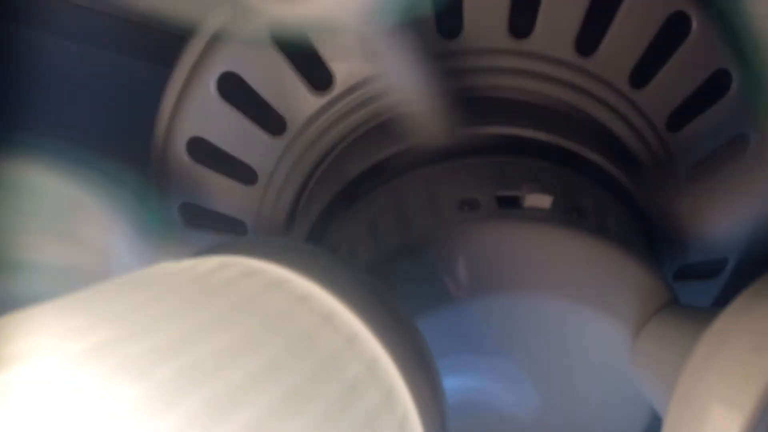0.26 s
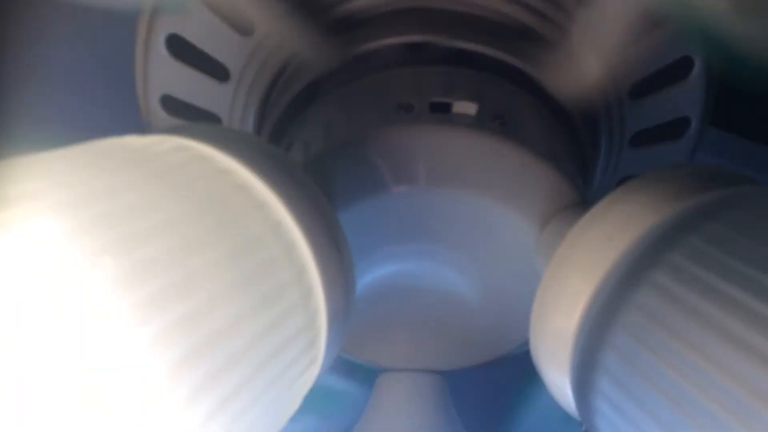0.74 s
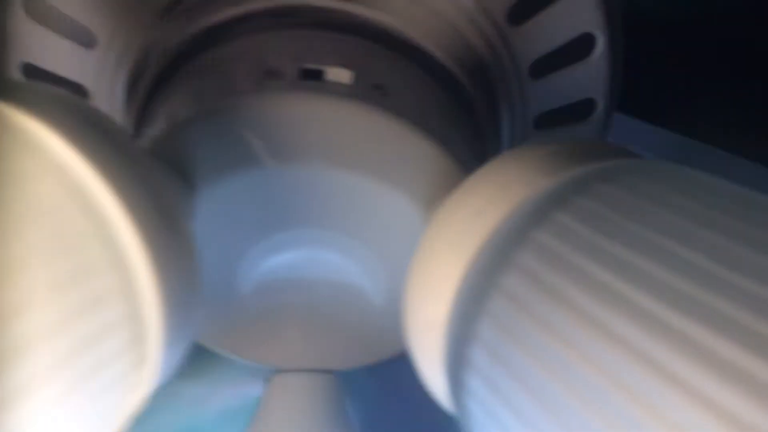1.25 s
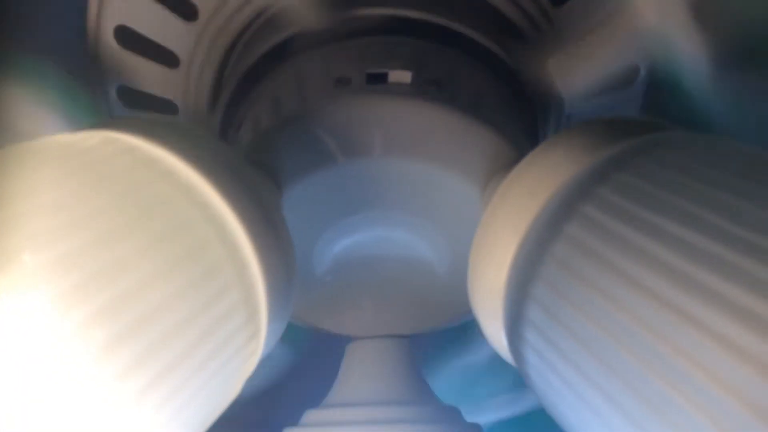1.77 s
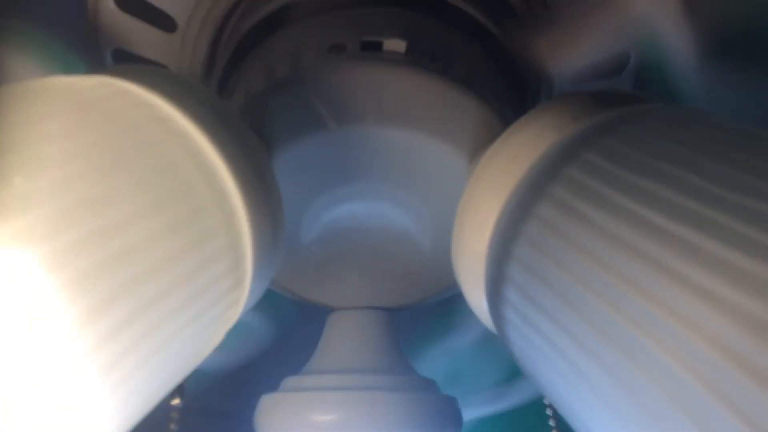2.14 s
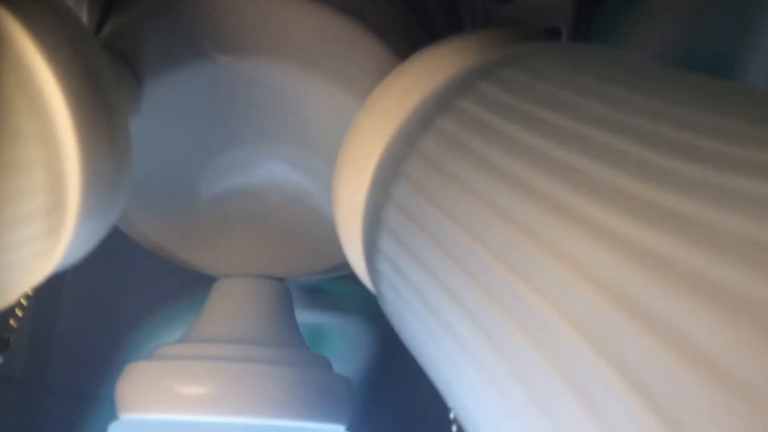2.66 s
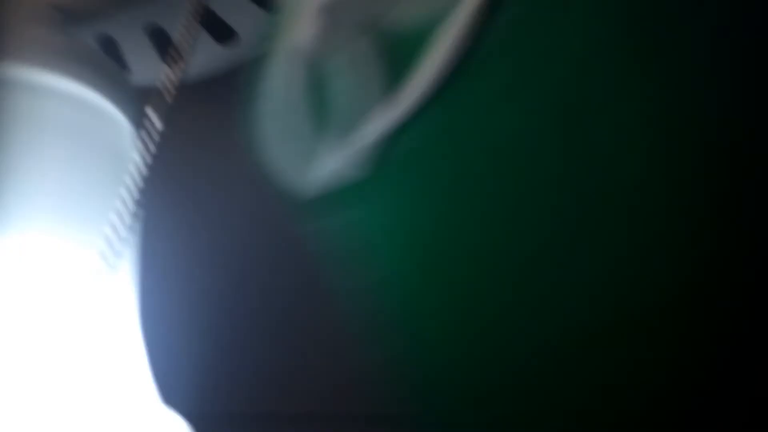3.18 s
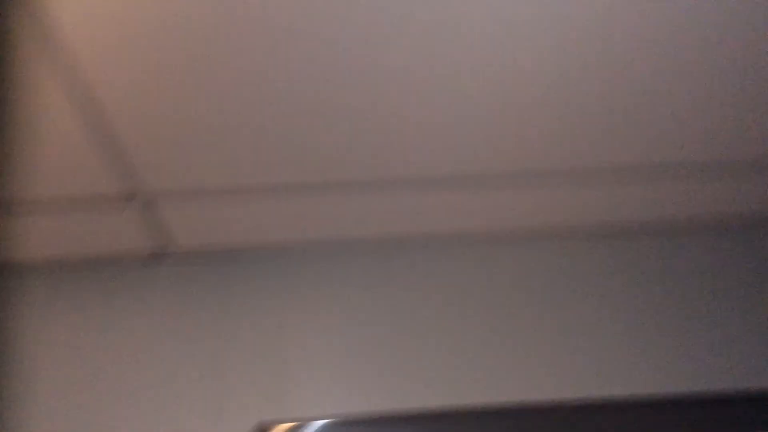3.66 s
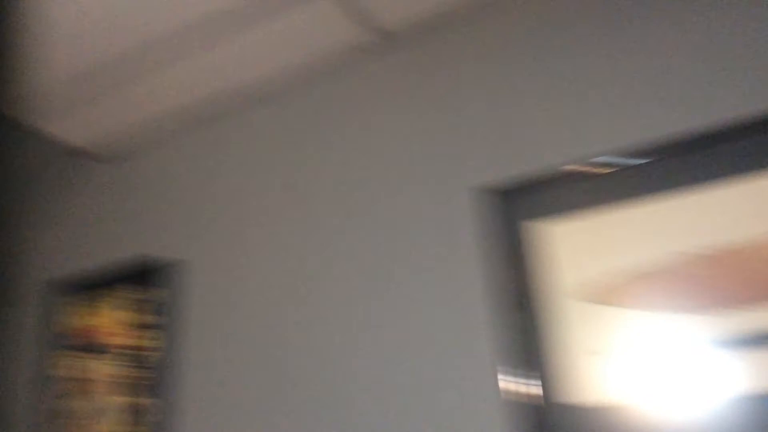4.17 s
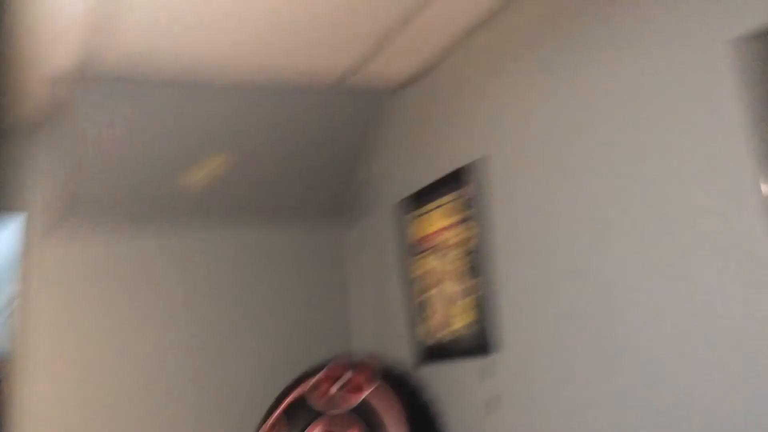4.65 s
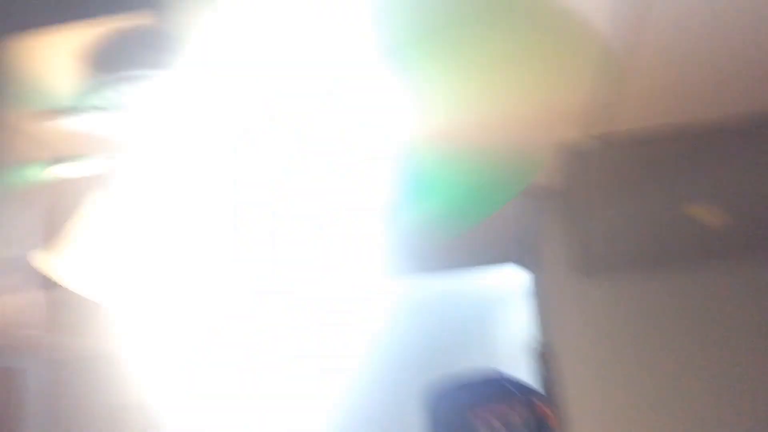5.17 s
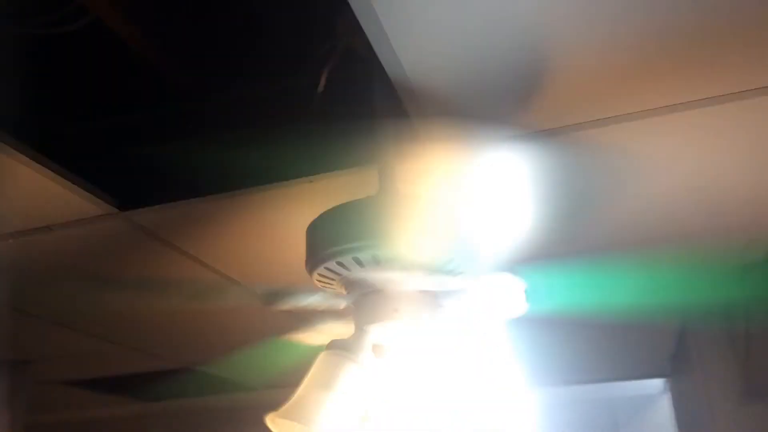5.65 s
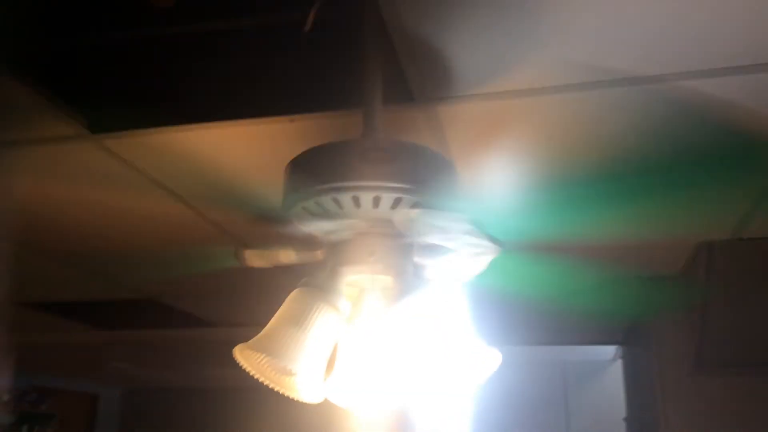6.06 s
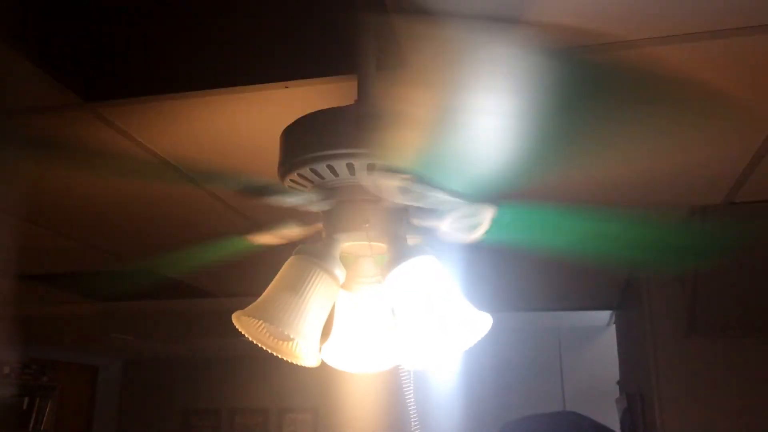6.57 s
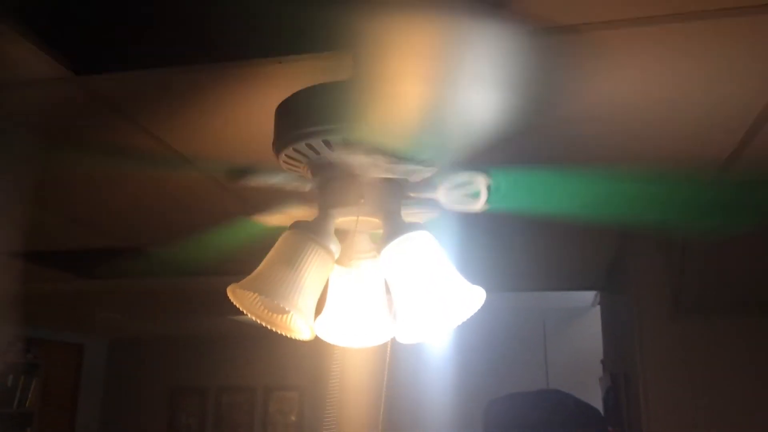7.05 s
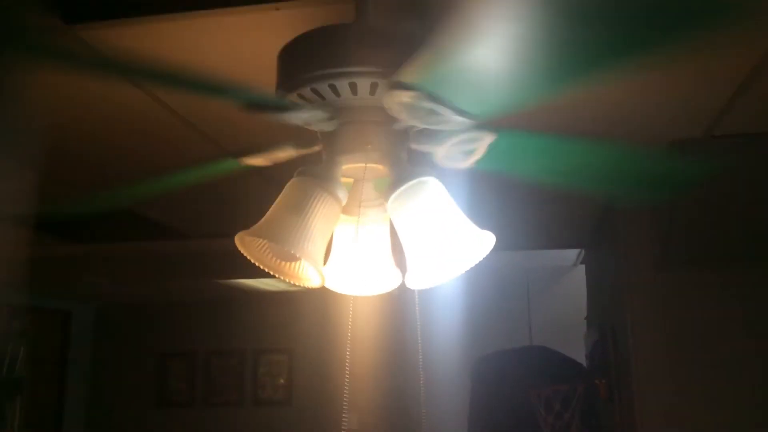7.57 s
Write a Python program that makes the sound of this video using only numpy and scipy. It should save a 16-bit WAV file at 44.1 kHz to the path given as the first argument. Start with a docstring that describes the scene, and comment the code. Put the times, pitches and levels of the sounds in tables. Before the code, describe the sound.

A low, wavering ceiling fan hum and soft stirred air continue quietly throughout, shifting slightly as the hand-held microphone moves in a small room. A parakeet whistle opens at 0 seconds with faint finger rubs; around 0.7 a short wing flutter comes with small bumps and ticks, then chirps from 0.9 to 1.5. From 1.6 to 2.9 a beak raps hollow plastic in sharp, uneven clusters, with soft warbles between. A quick contact call sounds at 3.0, and bright little bell clinks cluster from 3.2 to 3.5. Warbles grow around 4.0 to 4.5, with a faint creak, and feathery wing hiss runs from 4.2 to 4.9. A hard, dull microphone bump lands at 5.1, with smaller knocks after. A sharp chirp at 5.7 and another call at 5.9 lead to thin warbles, a few light taps and faint tinkles, then lively chirps from 7.1 to 7.7.

```python
"""Small room with a ceiling fan humming: wavering motor hum plus coloured noise for the stirred air.
Caged parakeets warble, chirp and call: gliding sine whistles with overtones. One flutters (shaped hiss),
raps a plastic toy with its beak (noise bursts through broad modes) and rings a little bell (decaying sines).
The hand-held microphone is bumped (low swing and tick), fingers slide on it (rub and crackle noise),
and its housing creaks (two harmonics)."""
import sys
import numpy as np
from scipy import signal
from scipy.fft import rfft, irfft
from scipy.io import wavfile
from scipy.ndimage import uniform_filter1d

SR = 44100
rng = np.random.default_rng(int(sys.argv[2]) if len(sys.argv) > 2 else 0)


def store_pcm(level_fs):
    """Save levels as 16-bit WAV."""
    pcm = np.round(np.clip(level_fs, -1, 1) * 32767).astype(np.int16)
    wavfile.write(sys.argv[1], SR, np.atleast_2d(pcm).T)


N = 344862


def gain_of(db):
    """Decibels to amplitude factor."""
    return 10 ** (np.asarray(db) / 20)


def evened(x):
    """Scales to rms 1."""
    return x / np.sqrt(np.mean(x ** 2) + 1e-20)


def read(points, hz):
    """Interpolates a table on a log-frequency axis."""
    f, value = np.transpose(points)
    return np.interp(np.log(hz + 1), np.log(f + 1), value)


def add(mix, start_s, sound):
    """Mixes a sound in at start_s."""
    part = mix[max(round(start_s * SR), 0):][:len(sound)]
    part += sound[:len(part)]


def played(rows):
    """Columns of a curve table at every sample."""
    s, *columns = np.transpose(rows)
    t = np.arange(s[0], s[-1], 1 / SR)
    return [np.interp(t, s, c) for c in columns]


def wander(count, smooth_s):
    """Random curve of rms 1: white noise smoothed twice."""
    size = max(round(smooth_s * SR), 1)
    once = uniform_filter1d(rng.standard_normal(count), size)
    return evened(uniform_filter1d(once, size))


def resonate(x, hz, width_hz):
    """Resonance of gain 1: shifts hz down to zero, smooths, shifts back."""
    turn = np.exp(2j * np.pi * np.cumsum(hz * np.ones(len(x))) / SR)
    r = np.exp(-np.pi * width_hz / SR)
    return 2 * (turn * signal.lfilter([1 - r], [1, -r], x / turn)).real


def noise(spectrum, count):
    """Noise of rms 1 with the given colour."""
    z = rfft(rng.standard_normal(count))
    colour = gain_of(read(spectrum, np.fft.rfftfreq(count, 1 / SR)))
    return evened(irfft(z * colour, count))


def swell(length_s):
    """Level curve in dB of a short action, 0 in its middle and lower at both ends."""
    end_db = -6
    t = np.arange(0, length_s, 1 / SR)
    return end_db * (2 * t / length_s - 1) ** 2


# whistle overtones: multiple of the pitch, level/dB
WHISTLE_OVERTONES = [(2, -6.5), (3, -15), (4, -24)]
# microphone colour on the whistle overtones: f/Hz, level/dB
MICROPHONE_COLOUR = [(4000, 7.5), (6400, -1.5), (7400, -6), (8600, 7), (9600, -4), (10800, -19.5),
                     (14000, -10.5)]


def note(length_s, db, first_hz, last_hz, over_db, rough, fade_db, warble):
    """A gliding whistle with overtones; roughness shakes its pitch, chops its level, adds an octave-down tone."""
    attack_s, onset_db, suboctave_db = 0.0053, -22, -14
    t = np.arange(0, length_s, 1 / SR)
    count = len(t)
    effort_db = db + onset_db * np.maximum(1 - t / attack_s, 0) + fade_db * t / length_s
    glide_hz = first_hz + (last_hz - first_hz) * t / length_s
    rough = np.clip(rough, 0, 1)
    # pitch deviation as a fraction
    shake = warble * wander(count, 0.01156) + 0.0094 * wander(count, 0.0046)
    shake += 0.32 * rough * wander(count, 0.00077)
    hz = glide_hz * (1 + shake)
    turns = np.cumsum(hz) / SR
    tone = np.sin(2 * np.pi * turns) + rough * gain_of(suboctave_db) * np.sin(np.pi * turns)
    upper = sum(gain_of(k_db + read(MICROPHONE_COLOUR, k * hz)) * np.sin(2 * np.pi * k * turns)
                for k, k_db in WHISTLE_OVERTONES)
    chop = gain_of(0.5 * wander(count, 0.0075) + 9 * rough * wander(count, 0.00054))
    voice = evened(chop) * (tone + gain_of(over_db) * upper)
    return gain_of(effort_db) * voice * signal.windows.tukey(count, .15)


# warbled notes, faint to fairly loud: t/s, length/s, level/dB, first f/Hz, last f/Hz, overtone level/dB
WARBLED_NOTES = [(0.0, 0.068, -32.5, 3410, 3320, -18), (0.097, .09, -51, 2070, 1890, -22),
                 (0.124, 0.089, -55, 3090, 2610, -8), (0.193, 0.076, -54, 1640, 1760, -17),
                 (1.082, 0.063, -50.5, 1900, 2020, -15), (1.227, 0.048, -49.5, 3350, 3190, 2.5),
                 (1.28, 0.065, -56, 2100, 2170, -15), (1.295, 0.11, -52, 2880, 2800, -6),
                 (1.507, .06, -55, 2100, 2170, -15), (1.974, 0.045, -44, 3170, 3010, -22),
                 (2.064, 0.056, -44, 3000, 2960, -12), (2.123, 0.13, -42, 2890, 2880, -5),
                 (2.129, 0.064, -39, 3690, 4130, -3), (2.334, 0.13, -46.5, 2864, 2890, -3),
                 (2.708, 0.16, -46, 3120, 3060, -24), (3.543, 0.097, -50, 2300, 2370, -21),
                 (3.622, 0.083, -47.5, 2750, 2640, -1), (3.66, 0.068, -55.5, 1750, 1590, -15),
                 (3.78, .07, -52, 3060, 2990, -8), (3.859, .12, -48, 2900, 2760, -8.5),
                 (3.949, 0.11, -51.5, 1860, 1867, 5.5), (3.989, 0.095, -44, 2650, 2670, -2),
                 (4.067, .1, -56, 1870, 1910, -2), (4.087, 0.11, -43.5, 3650, 3440, 1),
                 (4.18, 0.064, -32.5, 3440, 3480, 3), (4.464, 0.1, -31, 3780, 3830, -4),
                 (5.351, 0.063, -57.5, 2560, 2880, -1), (5.46, 0.057, -51, 3690, 3660, -8),
                 (5.498, .06, -55, 2030, 2050, -15), (5.568, 0.034, -40, 1870, 1844, -21.5),
                 (5.614, 0.071, -42.5, 2500, 2590, -27), (5.924, .05, -45.5, 2170, 2130, -22),
                 (6.112, 0.081, -41, 1860, 1890, -19), (6.252, 0.13, -55.5, 2300, 2320, -14),
                 (6.297, .07, -46, 3230, 3200, -12), (6.326, 0.15, -50, 1950, 1787, -15.5),
                 (6.423, .025, -47, 2020, 2900, -15), (6.45, 0.083, -57, 2580, 2446, -18.5),
                 (6.899, 0.056, -56.5, 2700, 2900, 1), (6.994, .025, -44.5, 3260, 2400, -20),
                 (7.018, 0.055, -58, 3010, 3150, -18), (7.072, 0.043, -48, 2500, 2640, -20),
                 (7.102, 0.081, -58, 2000, 2090, -18), (7.255, 0.085, -47.5, 3250, 3130, 3),
                 (7.305, 0.12, -49.5, 2300, 2580, -19), (7.388, 0.094, -52.5, 1750, 1706, -14),
                 (7.393, 0.065, -37.5, 3430, 3380, -10), (7.504, 0.027, -44, 3300, 3280, 4)]


def warbles(bird):
    """Warbled notes: nearly clear voice, wavering pitch, dying away."""
    for s, *row in WARBLED_NOTES:
        add(bird, s, note(*row, rough=0.08, fade_db=-15, warble=.06))


CHIRP_FADE_DB = -3.5  # holds, then stops
# chirped notes: t/s, length/s, level/dB, first f/Hz, last f/Hz, overtone level/dB, roughness 0-1
CHIRPED_NOTES = [(0.923, 0.031, -51, 2860, 3120, 1, 0.21), (0.951, 0.034, -37.5, 4410, 3740, -21, 0.21),
                 (0.991, 0.044, -35.5, 3222, 3482, -4.5, 0.14), (1.041, 0.078, -49, 3705, 3670, -10, 0.01),
                 (1.358, 0.018, -37.5, 3254, 3400, -6.5, 0.15), (1.369, 0.03, -39.5, 4270, 3530, -10, 0),
                 (1.411, 0.044, -43, 2890, 2993, -10, 0.21), (1.447, 0.15, -47, 3140, 3076, -9, 0.15),
                 (5.614, 0.047, -44, 5200, 3870, -6, 0.37), (5.67, .014, -23, 3920, 3040, -15, 0.18),
                 (5.699, .04, -34.5, 3130, 3450, -13, 0.21), (7.123, 0.029, -39, 4390, 4360, 2, 0.37),
                 (7.155, 0.0595, -36, 3284, 3275, 10.5, .1), (7.209, .025, -37, 4380, 4210, 3.5, 0.43),
                 (7.519, 0.016, -34, 3195, 3330, 7, 0.38), (7.539, 0.029, -28.5, 5000, 3560, 1.5, 0.25),
                 (7.561, 0.051, -30.5, 3136, 3100, 6.5, 0.05), (7.64, 0.043, -45, 2810, 2676, 17, 0.33)]


def chirps(bird):
    """Chirped notes: steadier pitch, level nearly held, per-note roughness."""
    for s, *row in CHIRPED_NOTES:
        add(bird, s, note(*row, CHIRP_FADE_DB, warble=.025))


# notes of one contact call: t from call start/s, length/s, level re call/dB,
# first f/Hz, last f/Hz, overtone level/dB, roughness 0-1
CALL_NOTES = [(0, 0.024, -1, 3890, 2616, -18, 0.048), (.026, 0.026, -4.5, 2465, 2710, -4, 0.045),
              (0.049, 0.029, 8.5, 3350, 3533, -13.5, 0.058), (.075, 0.059, -8, 2600, 2895, -6.5, 0.13),
              (.105, .05, 4, 3070, 3180, -19.5, .02), (.248, 0.023, -2.5, 2750, 3420, -17, 0.378),
              (.27, .088, 1, 3423, 3206, -16.5, .12), (.28, 0.078, -15.5, 2847, 2916, -11.5, .2)]
# calls: t/s, level/dB
CALL_TIMES = [(2.963, -26.5), (5.862, -24.5)]


def calls(bird):
    """The contact call: a fixed run of chirped notes."""
    for start_s, db in CALL_TIMES:
        for s, *row in CALL_NOTES:
            add(bird, start_s + s, gain_of(db) * note(*row, CHIRP_FADE_DB, warble=0.0284))


# wing strokes: t of top/s, level before rounding/dB, hiss centre f/Hz, rise/s
WING_STROKES = [(0.722, -33, 5130, 0.028), (0.751, -35, 5200, .05), (.8, -41.5, 5000, .05),
                (3.158, -32.5, 6460, 0.11), (3.27, -35, 6000, 0.032), (3.65, -59, 5800, 0.12),
                (4.001, -56, 4600, 0.078), (4.187, -40, 6550, .05), (4.235, -39.5, 5170, .07),
                (4.33, -35, 5630, 0.075), (4.375, -38, 4700, .07), (4.465, -31, 6100, 0.07),
                (4.5, -38, 6330, 0.056), (4.71, -30.5, 5750, 0.14), (4.769, -36.5, 5800, 0.082),
                (4.88, -29, 5900, 0.13)]
# feather hiss colour: f/Hz, level/dB
FEATHER_COLOUR = [(470, -76.5), (800, -46), (1130, -34.5), (2630, -18), (3090, -14), (4320, -13),
                  (5890, -10), (6590, -9), (7270, -23.5), (8440, -19.5), (11100, -34.5), (15500, -32)]


def stroke(top_s, db, hz, rise_s):
    """Grainy feather hiss with one bright band; rises to the top of the stroke and dies away."""
    depth_db, fall_db_per_s, round_s = 40, 247, 0.023
    t = np.arange(-rise_s, depth_db / fall_db_per_s, 1 / SR)
    level_db = db + np.minimum(depth_db * t / rise_s, -fall_db_per_s * t)
    level_db = uniform_filter1d(level_db, max(round(round_s * SR), 1))  # soft top
    hiss = noise(FEATHER_COLOUR, len(t)) * gain_of(2.2 * wander(len(t), .004))
    hiss = evened(hiss + 3.8 * resonate(hiss, hz, 1200))
    return top_s - rise_s, gain_of(level_db) * hiss


# beak on the toy: t/s, dry peak/dB, low-mode trim/dB (10 dB is added to it)
BEAK_RAPS = [(1.574, -18.5, -19.5), (1.594, -11, -9.5), (1.612, -6, -10), (1.624, -13, -9),
             (1.648, -17, -56), (1.729, -13, -4), (1.762, -18, -10), (1.833, -18.5, -13.5),
             (1.867, -21.5, -14.5), (1.888, -21, -17.5), (2.083, -23, -1.5), (2.106, -17.5, 11),
             (2.208, -12.5, -17.5), (2.229, -10, -11.5), (2.246, -9, -17), (2.273, -36, -5),
             (2.295, -29, 2), (2.335, -26, 1), (2.424, -21.5, 13), (2.53, -27, -19), (2.572, -21.5, -12),
             (2.6, -15, -15), (2.637, -41, -4), (2.733, -35.5, 6), (2.852, -20, -14.5), (2.876, -11, -14),
             (2.89, -8.5, -14.5), (2.905, -17, -5), (3.139, -18.5, -17), (3.186, -27, -5),
             (3.263, -22.5, -24), (3.275, -23.5, -15), (3.291, -17, -35), (4.623, -32, -24.5),
             (6.093, -34.5, 15), (6.746, -38, -1), (6.914, -48, -31), (7.702, -33, 2)]
# toy modes: f/Hz, width of the first of two passes/Hz, level/dB
TOY_MODES = [(506, 370, -18), (984, 125, -5.5), (1187, 585, -6.5), (1643, 300, -8), (1830, 524, 3.5),
             (2104, 8, -13.5), (2710, 810, -3), (3290, 260, -3.5), (4090, 72, 3), (5130, 349, 1),
             (5903, 524, 6.5), (6280, 147, 7), (8200, 1070, -11), (11060, 4800, -25.5),
             (13100, 1200, -31.5)]


def rap(db, low_db):
    """A few milliseconds of crack and a short rattle through the broad modes of hollow plastic."""
    t = np.arange(3000) / SR
    crack = rng.standard_normal(len(t)) * gain_of(-60 * t / 0.029) * np.minimum(t / 0.00041, 1)
    # the loose toy rattles on for a moment
    rattle_db = -10.5 - 60 * t / 0.068 + 5.6 * wander(len(t), 0.001375)
    crack += gain_of(rattle_db) * rng.standard_normal(len(t))
    # each blow lands on another spot
    spots_db = rng.normal(0, 2.5, len(TOY_MODES))
    ring = np.zeros(len(t))
    for (hz, width_hz, mode_db), spot_db in zip(TOY_MODES, spots_db):
        level_db = mode_db + spot_db + (low_db + 10) * (hz < 2400)
        ring += gain_of(level_db) * resonate(resonate(crack, hz, width_hz), hz, 3 * width_hz)
    return gain_of(db) * ring / abs(ring).max()


# bell modes: f/Hz
BELL_MODE_HZ = [2040, 5210, 5255, 6297, 7510, 8220, 10500, 10820, 11100, 11820, 12500, 14170]
# bell modes, same order: level/dB, t60 before the ring factor/s
BELL_MODES = [(-28.5, 0.22), (10, 0.11), (0.5, .12), (7.5, 0.096), (3, 0.14), (1.5, 0.065), (2, 0.086),
              (-26, 0.058), (-8, 0.076), (-7, 0.12), (-15, .06), (-7, 0.081)]


def struck(blows, spots_db, ring):
    """Blows ring the thin metal modes of the bell; the spot struck favours some of them."""
    out = np.zeros(len(blows))
    t = np.arange(10000) / SR
    for hz, (db, t60_s), spot_db in zip(BELL_MODE_HZ, BELL_MODES, spots_db):
        decay_db = -60 * t / (t60_s * max(ring, .2))
        mode = gain_of(db + spot_db + decay_db) * np.sin(2 * np.pi * hz * t)
        mode *= np.minimum(t / .001, 1)
        out += signal.fftconvolve(blows, mode)[:len(blows)]
    return out


# single bell blows: t/s, dry peak/dB, ring factor on t60, tilt/(dB/octave)
BELL_BLOWS = [(0.636, -42, 0.69, 5), (2.603, -39.5, 0.62, -40), (2.907, -34, 0.87, -42),
              (3.168, -28, .5, -6), (3.203, -21, 0.33, 2), (3.263, -32, .5, -7),
              (3.2775, -16.5, 0.67, -11.5), (3.327, -19, 0.6, -11), (3.4111, -37.5, 0.33, -4),
              (3.4965, -48, 0.97, -5), (3.527, -32.5, 0.72, 11), (4.335, -28, 1, 7),
              (5.4064, -35.5, 0.56, 7), (5.5134, -39, 0.7, -4), (6.72, -34, 0.66, 0),
              (7.4255, -27.5, 0.31, 4)]


def bell(db, ring, tilt_db):
    """One clear blow; a dull one favours the low modes."""
    tilt = tilt_db * np.log2(np.array(BELL_MODE_HZ) / 6000)
    spots_db = rng.normal(0, 2, len(BELL_MODES)) + tilt
    modes = struck(signal.unit_impulse(10000), spots_db, ring)
    return gain_of(db) * modes / abs(modes).max()


# loose clapper chattering on the bell: t/s, length/s, relative drive/dB
CLAPPER_BOUTS = [(0.1, 0.054, -63.5), (0.22, 0.048, -65.5), (.33, 0.039, -77), (0.43, 0.06, -67.5),
                 (0.555, 0.023, -67.5), (3.279, 0.027, -38), (5.41, 0.064, -61), (5.46, .1, -52.5),
                 (6.73, 0.1, -67), (7.43, 0.085, -54.5)]


def jingle(length_s, db):
    """Many faint blows in quick, uneven succession keep the modes sounding."""
    blows_per_s = 400
    level_db = db + swell(length_s)
    blows = gain_of(level_db) * rng.standard_normal(len(level_db))
    blows *= rng.random(len(level_db)) < blows_per_s / SR
    spots_db = rng.normal(0, 1.8, len(BELL_MODES))
    return gain_of(-9.0) * struck(np.pad(blows, (0, 8000)), spots_db, ring=0.52)


# bumps on the microphone housing: t/s, swing peak/dB, swing f/Hz, t60/s (at least 0.005), tick peak/dB
HOUSING_BUMPS = [(0.636, -29, 113, 0.0067, -39), (0.741, -32.5, 202, 0.041, -44),
                 (0.757, -29.5, 370, 0.049, -21.5), (.78, -35, 248, .02, -16.5),
                 (0.813, -36, 275, 0.045, -55), (.901, -33.5, 257, 0.041, -34),
                 (.912, -35, 254, 0.018, -36.5), (1.078, -30, 433, 0.013, -32),
                 (5.084, -31, 128, 0.058, -61), (5.111, -0.5, 238, 0.012, -17.5),
                 (5.141, -30.5, 397, 0.031, -33), (5.181, -33.5, 454, 0.032, -40),
                 (5.224, -39.5, 387, 0.093, -62), (5.263, -42, 338, 0.026, -38),
                 (5.278, -20.5, 233, 0.017, -22), (5.2975, -20.5, 172, 0.013, -17)]
# tick colour: f/Hz, level/dB
TICK_COLOUR = [(500, 3), (1000, -10.5), (1800, 0), (2600, -13.5), (3800, -1.5), (5500, -4.5), (7000, -21.5),
               (15500, -33.5)]


def bump(db, hz, t60_s, tick_db):
    """A dry tick, and a low push that builds over most of one swing and dies."""
    t = np.arange(6000) / SR
    late_s = np.maximum(t - .0013, 0)  # the push follows the tick
    top_s = .85 / hz
    rise = np.minimum(late_s / top_s, 1) ** 1.3
    fall = gain_of(-60 * np.maximum(late_s - top_s, 0) / max(t60_s, .005))
    swing = -np.sin(2 * np.pi * hz * late_s) * rise * fall
    tick = noise(TICK_COLOUR, len(t)) * gain_of(-60 * t / 0.017) * np.minimum(t / 0.0012, 1)
    return gain_of(db) * swing / abs(swing).max() + gain_of(tick_db) * tick / abs(tick).max()


# fingers sliding on the housing: t/s, length/s, mid-slide rub level/dB, mid-slide crackle level/dB
FINGER_SLIDES = [(0.087, 0.059, -50, -70), (0.22, 0.067, -52, -73), (0.377, .06, -57.5, -85),
                 (0.483, 0.042, -60, -57), (3.945, 0.1, -62, -54.5), (4.12, 0.083, -60, -57.5),
                 (5.126, 0.045, -43, -45.5), (5.175, 0.087, -54.5, -62), (5.27, 0.057, -57, -56),
                 (6.741, 0.033, -57, -55), (6.774, 0.083, -66, -62)]
# rub colour: f/Hz, level/dB
RUB_COLOUR = [(150, -22), (300, -9.5), (500, -7.5), (800, -14), (1200, -25), (3000, -25), (8000, -47)]
# crackle colour: f/Hz, level/dB
CRACKLE_COLOUR = [(400, -27.5), (1000, -6), (2000, -2.5), (4500, -7.5), (6500, -34), (15500, -62.5)]


def slide(length_s, rub_db, crackle_db):
    """Skin drags with a low rub and a fine crackle."""
    shape_db = swell(length_s)
    count = len(shape_db)
    rub = gain_of(rub_db + 2.4 * wander(count, 0.0046)) * noise(RUB_COLOUR, count)
    crackle = gain_of(crackle_db + 2.7 * wander(count, 0.00087)) * noise(CRACKLE_COLOUR, count)
    return (rub + crackle) * gain_of(shape_db) * signal.windows.tukey(count, .1)


# housing creaks: t/s, length/s, level/dB, mean slip rate f/Hz, second harmonic re first/dB
HOUSING_CREAKS = [(3.955, .068, -41, 288, -7)]


def creak(length_s, db, hz, second_db):
    """Quick, nearly regular slips of plastic on plastic."""
    size = round(length_s * SR)
    turns = np.cumsum(hz * (1 + 0.04 * wander(size, 0.009))) / SR
    slips = np.cos(2 * np.pi * turns) + gain_of(second_db) * np.cos(4 * np.pi * turns)
    return gain_of(db) * np.hanning(size) * slips


# fan as the microphone moves about the room: t/s, air level/dB, hum level/dB
FAN_LEVELS = [(0.0, -49.5, -53.5), (0.6, -53, -52.5), (0.8, -49.5, -65), (1.1, -54.5, -50),
              (1.7, -51.5, -52), (2.1, -50, -64.5), (2.5, -50.5, -54.5), (3.4, -53, -56), (3.5, -52.5, -75),
              (3.85, -52.5, -83), (4.4, -55, -67), (5.1, -57.5, -55), (5.4, -58, -76), (6.1, -55.5, -55),
              (6.4, -58, -58.5), (7.2, -56, -51), (7.82, -55.5, -57.5)]
# air colour: f/Hz, level/dB
AIR_COLOUR = [(12, -49), (20, -9.5), (122, -7), (259, -15.5), (597, -24.5), (725, -25.5), (1010, -29.5),
              (1340, -28.5), (1770, -30.5), (2150, -27), (4430, -38.5), (6020, -39), (7110, -45.5),
              (9130, -46.5), (15500, -67.5)]
# hum partials: multiple of the hum pitch, level/dB
HUM_PARTIALS = [(1, 0), (1.5, -9), (2, -14)]


def fan():
    """Stirred air that swells a little, and the wavering hum of the motor windings."""
    hum_hz, waver_hz = 120, 2.5
    air_db, hum_db = (np.resize(c, N) for c in played(FAN_LEVELS))
    air = gain_of(air_db + 2.4 * wander(N, 0.031)) * noise(AIR_COLOUR, N)
    turns = np.cumsum(hum_hz + waver_hz * wander(N, .04)) / SR
    hum = np.zeros(N)
    for k, db in HUM_PARTIALS:
        hum += gain_of(db + 3 * wander(N, .03)) * np.sin(2 * np.pi * k * turns)
    return air + gain_of(hum_db) * hum


# room decay: f/Hz, t60/s
ROOM_DECAY = [(300, 0.2), (2000, 0.31), (6000, 0.2), (14000, 0.23)]


def room(x):
    """Sparse taps of random sign, each band dying at its own speed."""
    taps = np.zeros(SR // 2)
    at = np.arange(200, len(taps) - 20, 20)
    taps[at + rng.integers(0, 20, len(at))] = rng.choice([-1., 1.], len(at))
    hz, t, z = signal.stft(taps, SR, nperseg=256)
    decay = gain_of(-60 * t / read(ROOM_DECAY, hz)[:, None])
    tail = signal.istft(z * decay, SR, nperseg=256)[1]
    return signal.fftconvolve(x, tail / np.linalg.norm(tail))[:N]


def scene():
    """Birds across the room, heard mostly by their echoes; handling reaches the microphone directly."""
    bird, wing, toys, near = np.zeros((4, N))
    warbles(bird)
    chirps(bird)
    calls(bird)
    for row in WING_STROKES:
        add(wing, *stroke(*row))
    for mix, rows, source in [(toys, BEAK_RAPS, rap), (toys, BELL_BLOWS, bell), (toys, CLAPPER_BOUTS, jingle),
                              (near, HOUSING_BUMPS, bump), (near, FINGER_SLIDES, slide),
                              (near, HOUSING_CREAKS, creak)]:
        for s, *row in rows:
            add(mix, s, source(*row))
    echoes = room(bird + gain_of(-4) * wing + gain_of(-10) * toys)
    direct = gain_of(-8) * bird + gain_of(4.0) * wing + toys
    return (direct + echoes + near + fan())[None]


def record(dry):
    """The small microphone drops the deep bass; then the band limit."""
    low_cut_hz, edge_hz = 50, 15900
    dry = signal.sosfilt(signal.butter(2, low_cut_hz, "high", fs=SR, output="sos"), dry)
    low_pass = signal.firwin(511, edge_hz, window=("kaiser", 9), fs=SR)
    return signal.oaconvolve(dry, low_pass[None], "same")


dry = scene()
out = record(dry)
store_pcm(out)
```